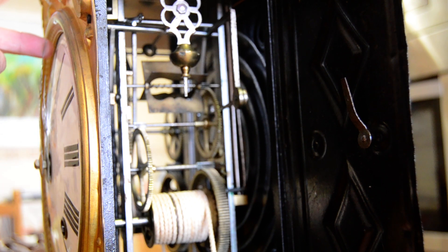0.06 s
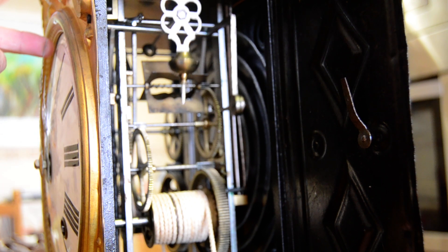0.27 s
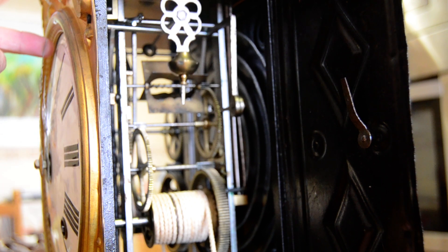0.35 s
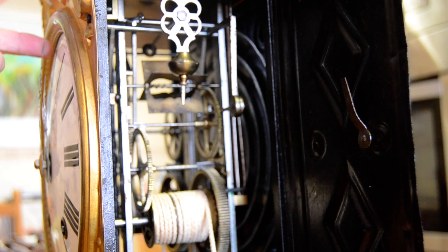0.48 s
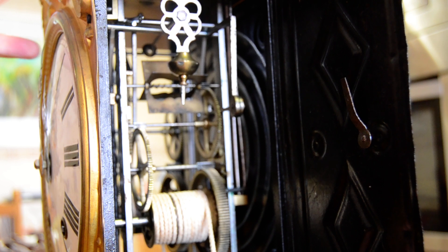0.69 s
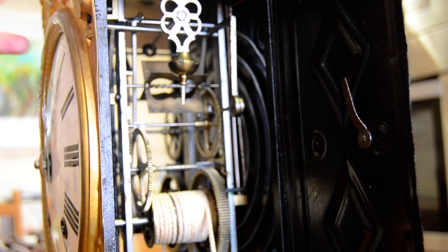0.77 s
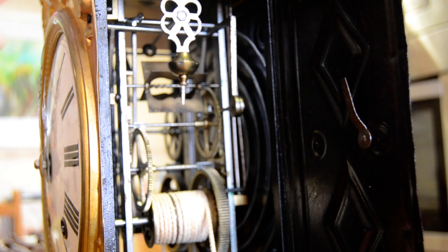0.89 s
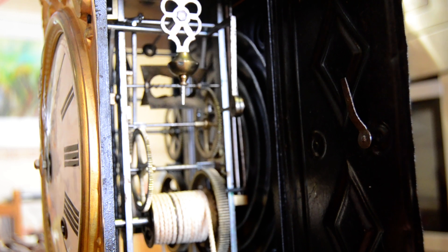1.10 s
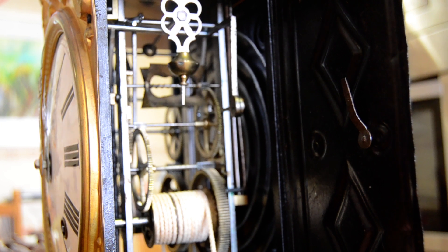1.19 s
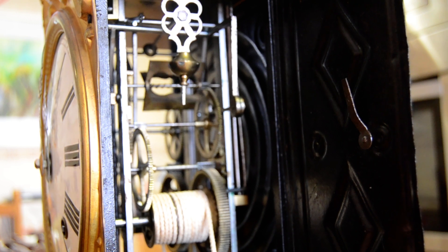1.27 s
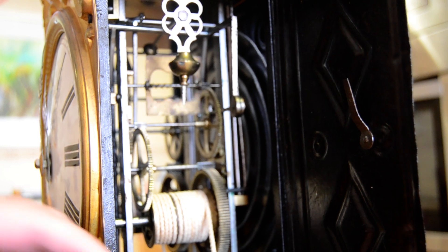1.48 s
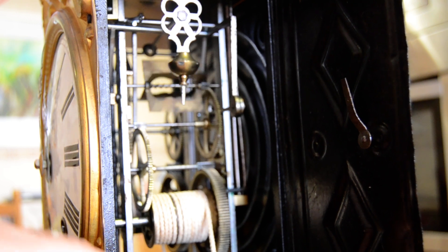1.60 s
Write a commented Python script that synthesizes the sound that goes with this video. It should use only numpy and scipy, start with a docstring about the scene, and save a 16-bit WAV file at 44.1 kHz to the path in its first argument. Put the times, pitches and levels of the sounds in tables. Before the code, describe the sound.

A sharp metallic clack comes from a clock movement, followed by a rapid chatter of weaker clicks and a short ring. Soft room noise and a thin whine continue underneath, and two faint knocks come near the end.

```python
"""Soft room noise and a thin whine sound throughout. Two faint knocks come first. Then, as a fingertip
moves the hand of a weight-driven wall clock, a steel lever in the movement drops with a clack.
It rebounds and chatters to rest, each impact exciting free vibration of the steel parts, the plates,
the frame and the wooden case. These ring on while the bare room reverberates. Near the end a treble
hiss swells a little and two more faint knocks follow."""
import sys
import numpy as np
from scipy import signal
from scipy.fft import rfft, irfft
from scipy.io import wavfile

SR = 44100
rng = np.random.default_rng(int(sys.argv[2]) if len(sys.argv) > 2 else 0)


def int16_out(signal):
    """Quantize to a 16-bit WAV file."""
    q = np.round(np.clip(np.atleast_2d(signal).T, -1, 1) * 32767)
    wavfile.write(sys.argv[1], SR, q.astype(np.int16))


N = 72765
TIME = np.arange(N) / SR

# spectra of the room noise, the hiss and a knock: (frequency [Hz], relative level [dB])
ROOM_NOISE_SPECTRUM = [(25, -10.5), (60, -7.5), (130, -2.5), (250, 2), (600, 0.5), (1000, 0.5),
                       (1500, -3.5), (3000, -7.5), (6000, -16), (8000, -24), (10000, -25.5), (12000, -41.5)]
HISS_SPECTRUM = [(4000, -21), (7500, -4), (9500, 0.5), (12000, -16)]
KNOCK_SPECTRUM = [(80, -17.5), (250, -4.5), (600, -7.5), (900, 0.5), (1100, 2.5), (1700, -23), (3500, -13),
                  (8000, -34)]
# envelope of the hiss: (time [s], level [dB])
HISS_ENVELOPE = [(0, -105), (.8, -89.5), (1.15, -90.5), (1.35, -84), (1.65, -89)]
# faint knocks: (time [s], level [dB])
KNOCK_EVENTS = [(.208, -66.5), (.226, -73), (1.435, -61), (1.451, -57)]
# decay of the room: (frequency [Hz], reverberation time [s])
REVERBERATION_TIMES = [(200, .7), (1200, 1), (3000, .68), (5500, 0.6), (9000, .52), (12000, 0.33)]
# normal modes of case, plates and lever: (frequency [Hz], relative level [dB], nominal T60 [s])
WOODEN_CASE_MODES = [(86, -9, 0.58), (150, -8, .4), (205.8, -0.5, 0.4), (264.2, -10.5, 1),
                     (382.9, -7.5, 0.47), (434.6, -16.5, 0.56)]
MOVEMENT_PLATE_MODES = [(774, -12, .45), (829, -13.5, 0.46), (859, -13, 0.41), (1093, -4.5, 0.28),
                        (1092.7, -1.5, 0.35), (1142, -4, 0.72), (1207, -12, .3), (1249, -10.5, 0.23),
                        (1310, -7.5, 0.55), (1332, -8, 0.51)]
STEEL_LEVER_MODES = [(2750, -26, 0.0162), (3600, -14.5, 0.0089), (4700, -19, 0.047), (5092, -1, .016),
                     (5210, -10, 0.016), (5560, -17, 0.021), (6140, -15.5, .013), (7220, -19.5, 0.0104),
                     (8456, -10.5, .011), (9030, -9.5, .01), (9450, -13, 0.014)]
# dense resonances of the frame and of the small steel parts: (frequency [Hz], relative level [dB])
FRAME_SPECTRUM = [(60, -36), (170, -11.5), (550, -18.5), (800, -1), (980, -3.5), (1130, 4), (1350, -1),
                  (1700, -13), (2800, -10.5), (5000, -37)]
TICK_SPECTRUM = [(300, -16), (900, -11.5), (1400, -5), (2000, -10), (3600, -7), (4500, -7), (5400, -1.5),
                 (6700, -17), (7300, -8), (7800, -12.5), (8400, -1), (9400, -4.5), (10600, -12.5),
                 (12000, -34)]
# impacts of the lever: (time [s], tick gain [dB], tick tilt [dB/octave], lever gain [dB],
# plate and frame gain [dB], case gain [dB])
IMPACTS = [(0.2465, -1, 0.74, 0, 1, 1.5), (0.3050, -9.5, 0, -6.5, -9, 1), (0.3667, -5, 1, -1, -3.5, -2.5),
           (0.4009, -13.5, 0, -8.5, -11.5, -5.5), (0.4388, -11, -0.5, -10, -13.5, -10),
           (0.4624, -9, -0.5, -14.5, -12, -12), (0.4737, -14, -1.5, -11.5, -14.5, -3.5),
           (0.5090, -15.5, 0, -16, -14.5, -6), (0.5303, -24, 1, -20.5, -21.5, -12.5),
           (0.554, -34, -2, -27, -30, -22)]

ROOM_NOISE_DB, KNOCK_T60_S = -68.5, 0.07
WHINE_HZ, WHINE_DB, WHINE_FADE_DB_PER_S = 1043.6, -66, 3
WAVER_HZ, WAVER_DEPTH = 5, 0.033
BEAT_TONE_HZ, BEAT_TONE_DB = 1885, -79.5
BEAT_DEPTH, BEAT_PEAK_S, BEAT_PERIOD_S = 0.63, 0.034, 0.2
ROOM_GAIN_DB, ROOM_RISE_S = -3, 0.002
ECHO_DELAY_S, ECHO_GAIN_DB = 0.0042, -9.5
CASE_GAIN_DB, CASE_RISE_S = -48.5, 0.02
PLATE_GAIN_DB, PLATE_RISE_S = -37.5, 0.014
FRAME_GAIN_DB, FRAME_RISE_S, FRAME_T60_S = -42, 0.0043, 0.74
TICK_GAIN_DB, TICK_T60_S, BURST_RISE_S = -22.5, 0.03, 0.0015
LEVER_GAIN_DB, LEVER_SPREAD_DB = -25.5, 1
LEVER_TO_ROOM_DB = -10  # the lever's ring reaches the room more weakly than the ticks
LOW_CUT_HZ, ROLL_OFF_HZ, CUTOFF_HZ = 65, 11120, 11375


def from_db(db):
    """Amplitude ratio: a factor of ten for every 20 dB."""
    return 10 ** (np.asarray(db) / 20)


def at_hz(points, hz):
    """Interpolation on a logarithmic frequency axis."""
    frequencies, values = np.transpose(points)
    return np.interp(np.log(np.maximum(hz, 1)), np.log(frequencies), values)


def noise(spectrum):
    """Spectral shaping: white noise is weighted by frequency and scaled to unit rms."""
    hz = np.arange(N // 2 + 1) * SR / N
    white = rfft(rng.standard_normal(N))
    shaped = irfft(white * from_db(at_hz(spectrum, hz)), N)
    return shaped / np.sqrt(np.mean(shaped ** 2) + 1e-20)


def decay(t60, rise_s):
    """Exponential damping: after its build-up the envelope falls 60 dB in t60 seconds."""
    return (1 - np.exp(-TIME / rise_s)) * np.exp(-np.log(1000) * TIME / t60)


def sinusoid(hz):
    """Simple harmonic motion with a random phase."""
    return np.sin(2 * np.pi * (hz * TIME + rng.random()))


def add(out, start_s, sound):
    """Linear superposition of a sound from a given time onward."""
    start = int(start_s * SR)
    out[start:] += sound[:N - start]


def background():
    """Incoherent addition: steady room noise and a treble hiss that swells a little."""
    hiss_db = np.interp(TIME, *np.transpose(HISS_ENVELOPE))
    room_noise = from_db(ROOM_NOISE_DB) * noise(ROOM_NOISE_SPECTRUM)
    return room_noise + from_db(hiss_db) * noise(HISS_SPECTRUM)


def whine():
    """Amplitude modulation: a fading tone wavers at random; a fainter, higher one beats regularly."""
    waver = 1 + WAVER_DEPTH * noise([(WAVER_HZ, 0), (2 * WAVER_HZ, -100)])
    low = from_db(WHINE_DB - WHINE_FADE_DB_PER_S * TIME) * waver * np.sin(2 * np.pi * WHINE_HZ * TIME)
    beat = 1 + BEAT_DEPTH * np.cos(2 * np.pi * (TIME - BEAT_PEAK_S) / BEAT_PERIOD_S)
    high = from_db(BEAT_TONE_DB) * beat * np.sin(2 * np.pi * BEAT_TONE_HZ * TIME)
    return np.sqrt(2) * (low + high)  # rms to peak amplitude


def knocks():
    """Heavily damped transients: noise bursts with little treble are heard as dull knocks."""
    out = np.zeros(N)
    for start_s, db in KNOCK_EVENTS:
        add(out, start_s, from_db(db) * noise(KNOCK_SPECTRUM) * decay(KNOCK_T60_S, BURST_RISE_S))
    return out


def room_reverberation(source):
    """Reverberation: convolution with diffuse reflections that die sooner in the treble."""
    edges_hz = np.geomspace(100, 14000, 13)
    tail = np.zeros(N)
    for low, high in zip(edges_hz, edges_hz[1:]):
        bandpass = signal.butter(2, [low, high], "band", fs=SR, output="sos")
        band = signal.sosfilt(bandpass, rng.standard_normal(N))
        tail += band * decay(at_hz(REVERBERATION_TIMES, np.sqrt(low * high)), ROOM_RISE_S)
    return from_db(ROOM_GAIN_DB) * signal.fftconvolve(source, tail / np.linalg.norm(tail))[:N]


def case_echo(clicks):
    """Early reflection: the back of the case returns the clicks, delayed and weakened."""
    out = np.zeros(N)
    add(out, ECHO_DELAY_S, from_db(ECHO_GAIN_DB) * clicks)
    return out


def modal_ring(modes, rise_s):
    """Modal superposition: a struck body vibrates as a sum of damped sinusoids."""
    return sum(from_db(db) * decay(t60, rise_s) * sinusoid(hz) for hz, db, t60 in modes)


def clock_body():
    """Structure-borne sound: each impact shakes the plates, frame and case, which ring on."""
    out = np.zeros(N)
    for start_s, _, _, _, blow_db, case_db in IMPACTS:
        plates = from_db(PLATE_GAIN_DB) * modal_ring(MOVEMENT_PLATE_MODES, PLATE_RISE_S)
        frame = from_db(FRAME_GAIN_DB) * noise(FRAME_SPECTRUM) * decay(FRAME_T60_S, FRAME_RISE_S)
        case = from_db(CASE_GAIN_DB + case_db) * modal_ring(WOODEN_CASE_MODES, CASE_RISE_S)
        add(out, start_s, from_db(blow_db) * (plates + frame) + case)
    return out


def lever_ring():
    """Free vibration: modes swell as the blow spreads through the lever, in a new balance each time."""
    out = np.zeros(N)
    for hz, db, t60 in STEEL_LEVER_MODES:
        age = np.minimum(np.log(1000) * TIME / t60, 100)  # in time constants
        envelope = age * np.exp(1 - age)
        strength = from_db(db - LEVER_SPREAD_DB * rng.uniform(-1, 1))
        out += strength * envelope * sinusoid(hz)
    return from_db(LEVER_GAIN_DB) * out


def lever_impacts():
    """Impact excitation: each contact rings the lever and draws a bright tick from small steel parts."""
    ticks, rings = np.zeros(N), np.zeros(N)
    for start_s, tick_db, tilt, ring_db, _, _ in IMPACTS:
        spectrum = [(hz, db + tilt * np.log2(hz / 1000)) for hz, db in TICK_SPECTRUM]
        tick = noise(spectrum) * decay(TICK_T60_S, BURST_RISE_S)
        add(ticks, start_s, from_db(TICK_GAIN_DB + tick_db) * tick)
        add(rings, start_s, from_db(ring_db) * lever_ring())
    return ticks, rings


def scene():
    """Superposition of the clock's direct sound, its reflections and the background in one channel."""
    ticks, rings = lever_impacts()
    clicks = ticks + rings
    reflections = case_echo(clicks) + room_reverberation(ticks + from_db(LEVER_TO_ROOM_DB) * rings)
    return (clicks + reflections + clock_body() + knocks() + background() + whine())[None]


def record(dry):
    """Band limiting: the microphone loses deep bass and rolls off the treble; the top is cut steeply."""
    low_cut = signal.butter(2, LOW_CUT_HZ, "high", fs=SR, output="sos")
    roll_off = signal.butter(12, ROLL_OFF_HZ, fs=SR, output="sos")
    steep_cut = signal.ellip(10, 0.3, 70, CUTOFF_HZ, fs=SR, output="sos")
    return signal.sosfilt(np.vstack([low_cut, roll_off, steep_cut]), dry)


dry = scene()
out = record(dry)
int16_out(out)
```